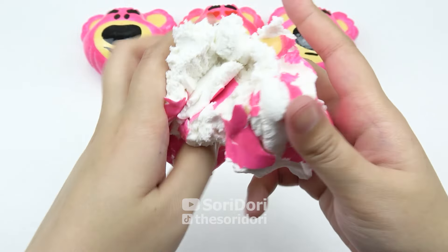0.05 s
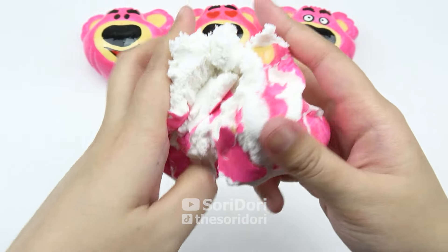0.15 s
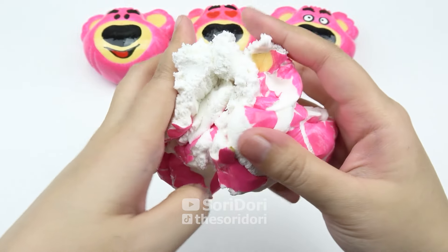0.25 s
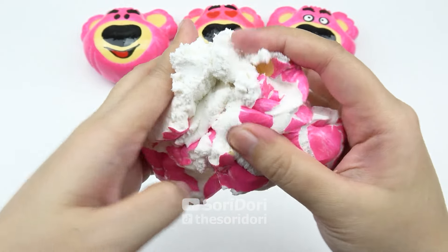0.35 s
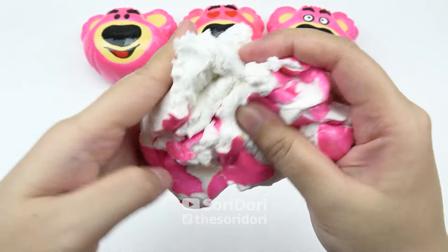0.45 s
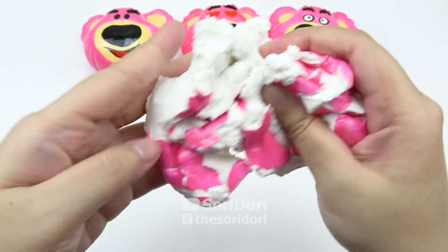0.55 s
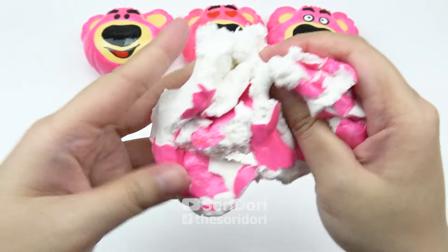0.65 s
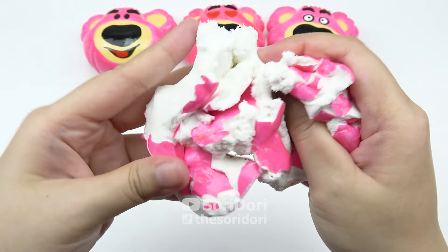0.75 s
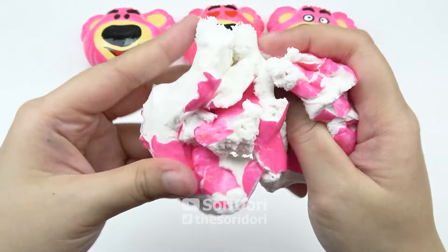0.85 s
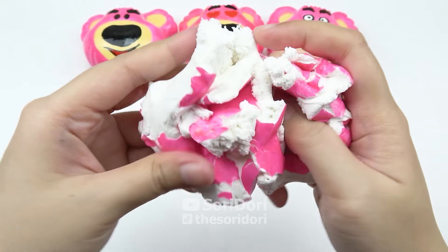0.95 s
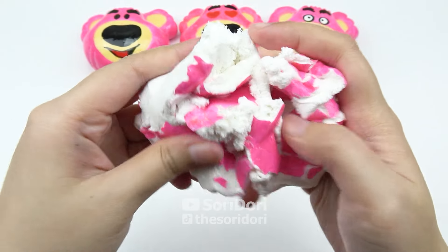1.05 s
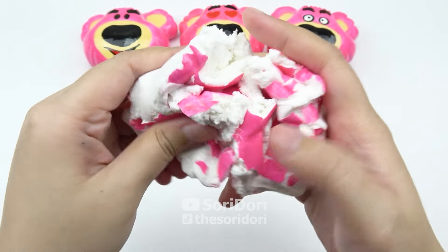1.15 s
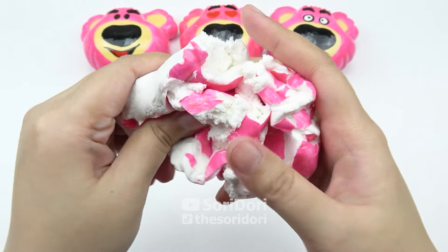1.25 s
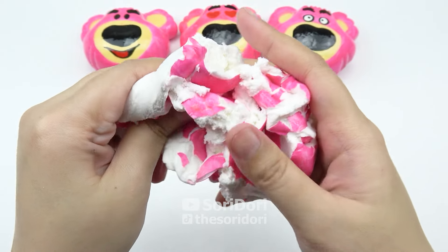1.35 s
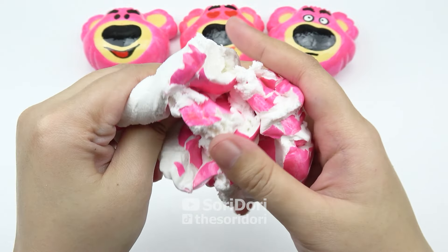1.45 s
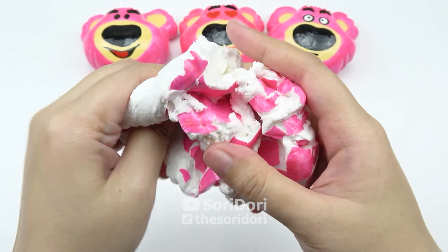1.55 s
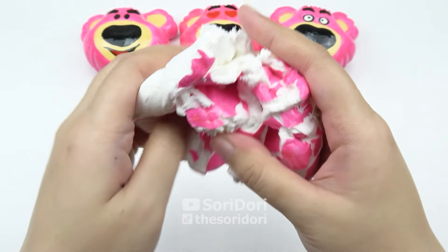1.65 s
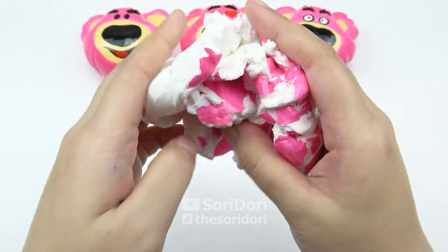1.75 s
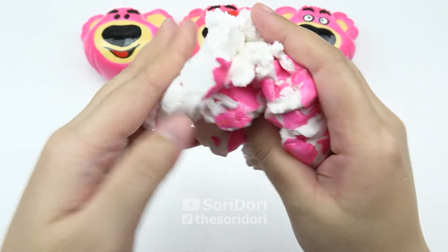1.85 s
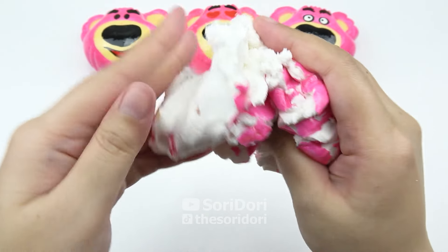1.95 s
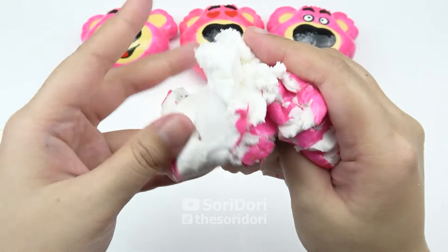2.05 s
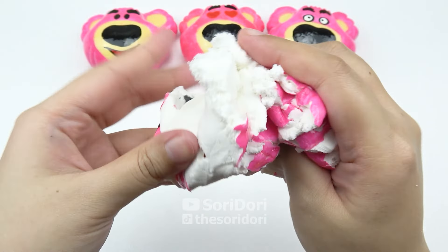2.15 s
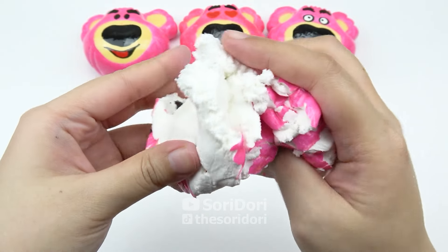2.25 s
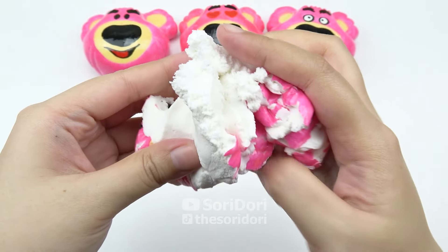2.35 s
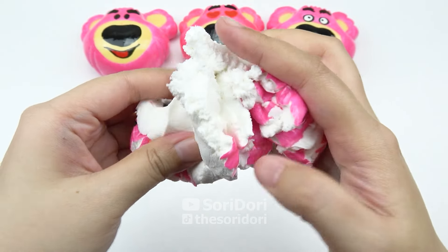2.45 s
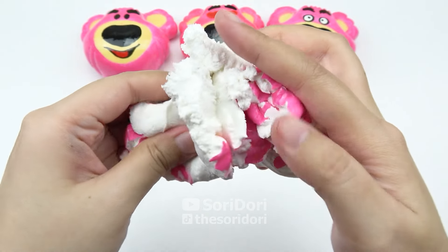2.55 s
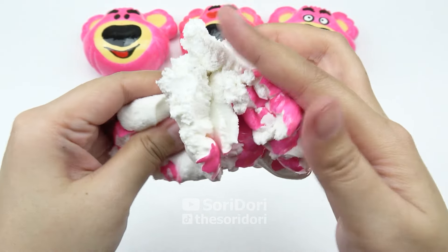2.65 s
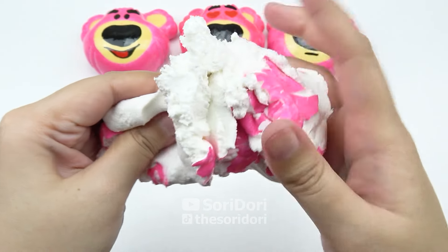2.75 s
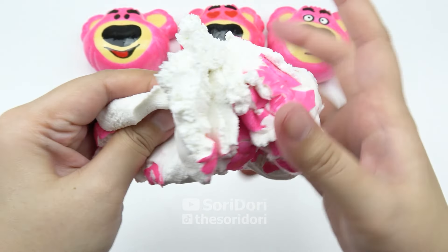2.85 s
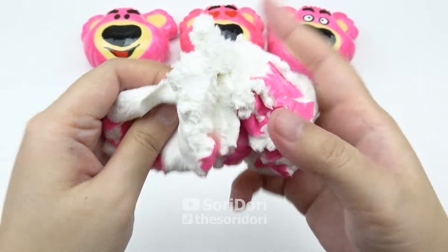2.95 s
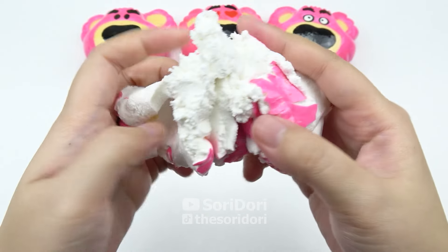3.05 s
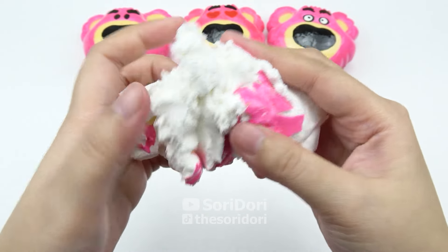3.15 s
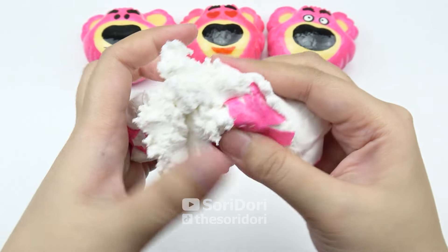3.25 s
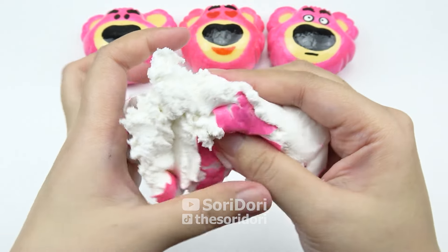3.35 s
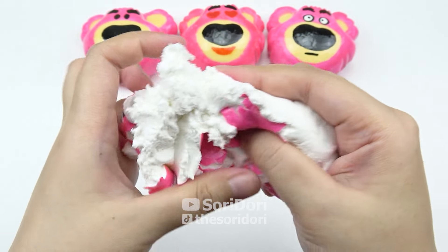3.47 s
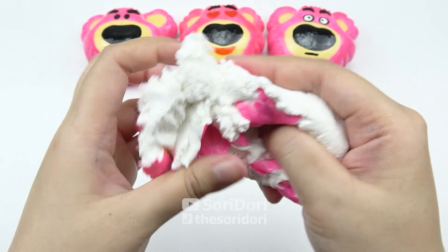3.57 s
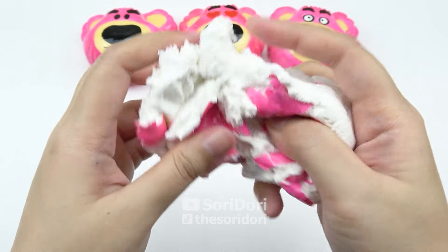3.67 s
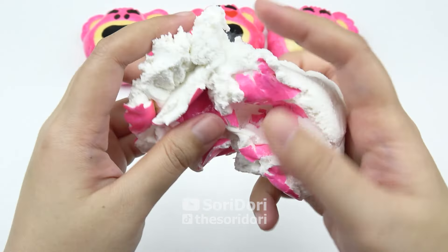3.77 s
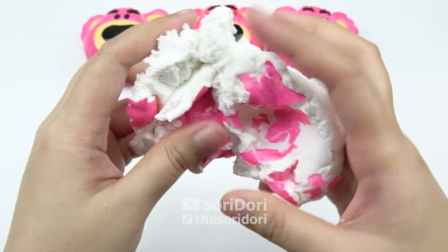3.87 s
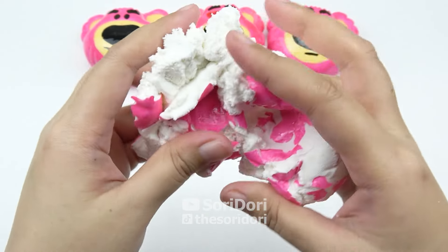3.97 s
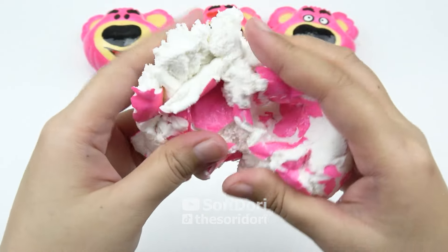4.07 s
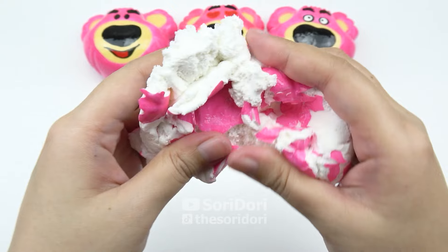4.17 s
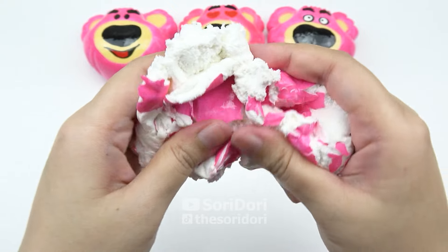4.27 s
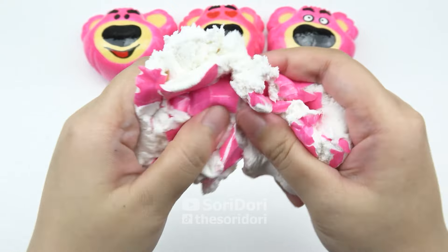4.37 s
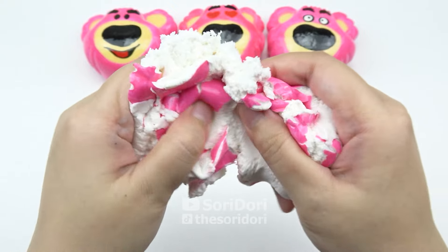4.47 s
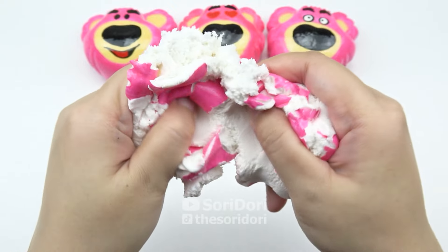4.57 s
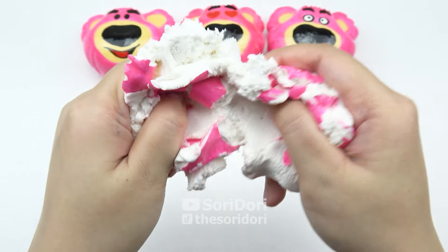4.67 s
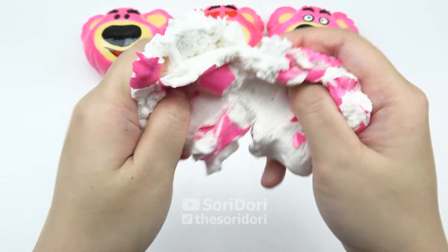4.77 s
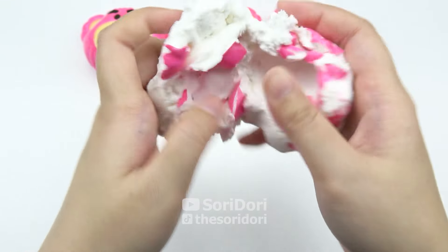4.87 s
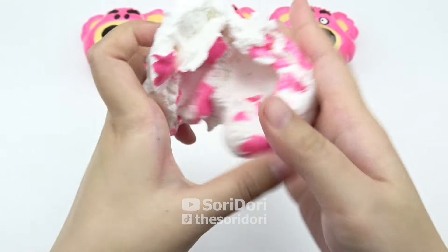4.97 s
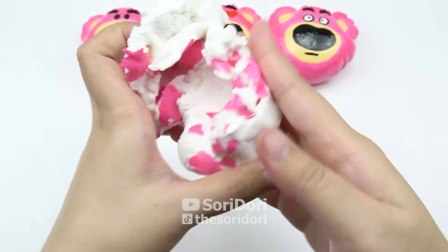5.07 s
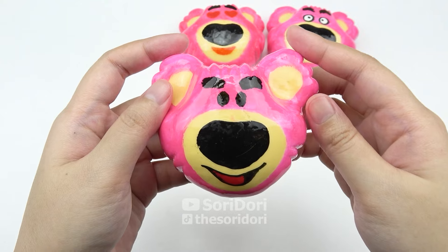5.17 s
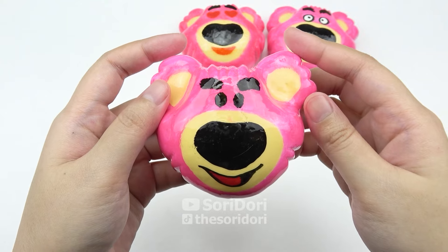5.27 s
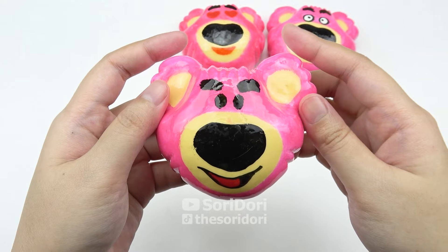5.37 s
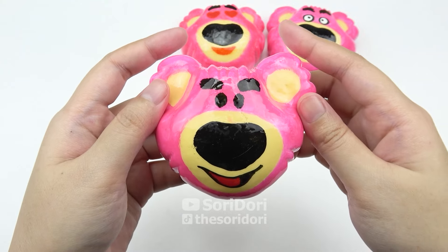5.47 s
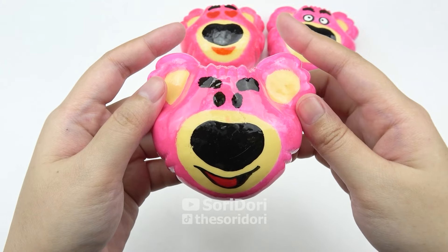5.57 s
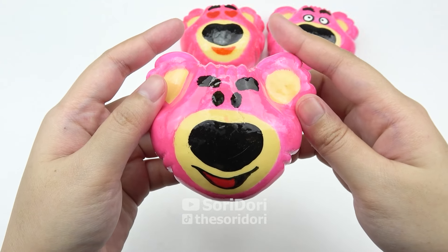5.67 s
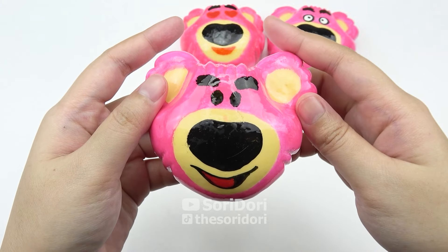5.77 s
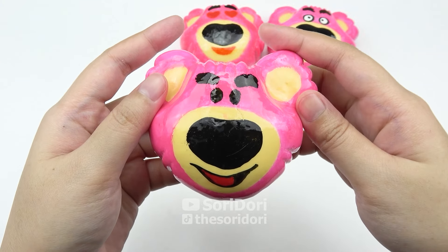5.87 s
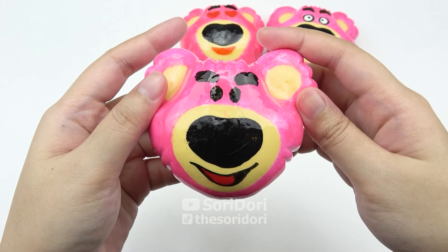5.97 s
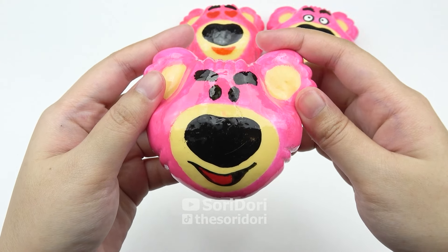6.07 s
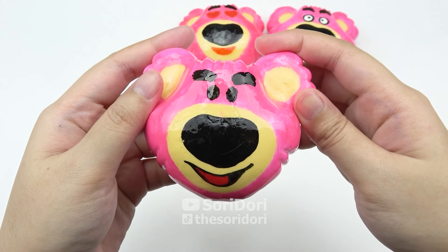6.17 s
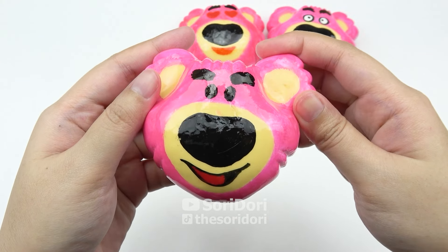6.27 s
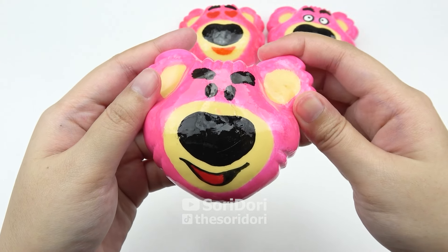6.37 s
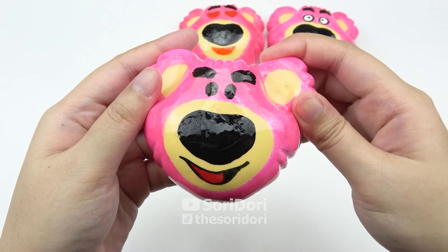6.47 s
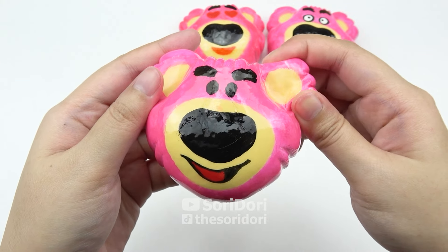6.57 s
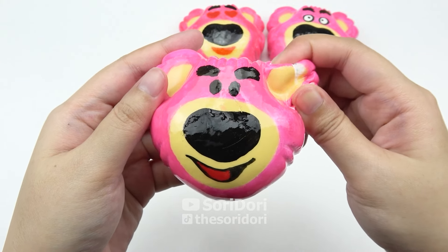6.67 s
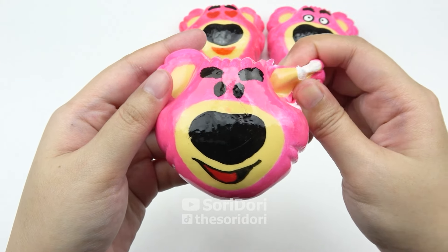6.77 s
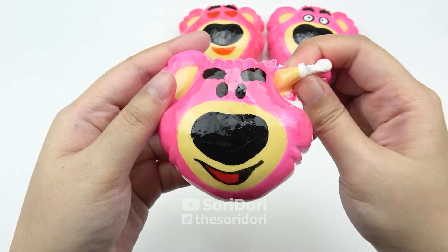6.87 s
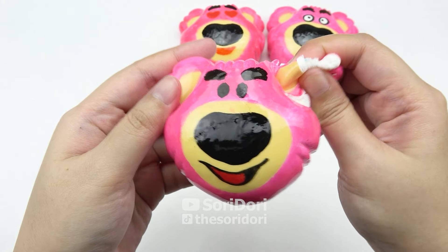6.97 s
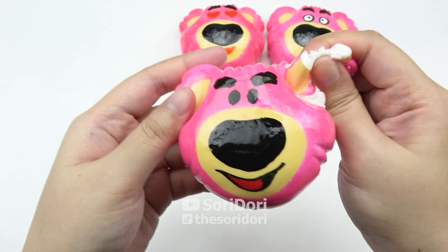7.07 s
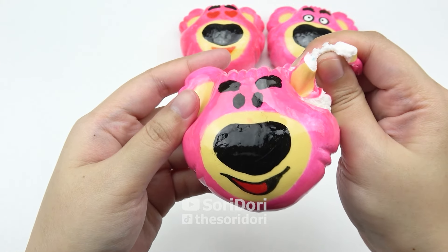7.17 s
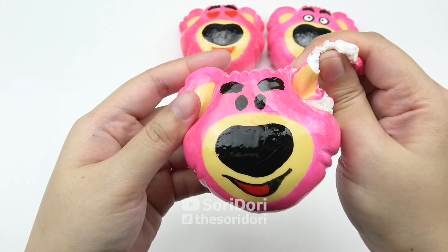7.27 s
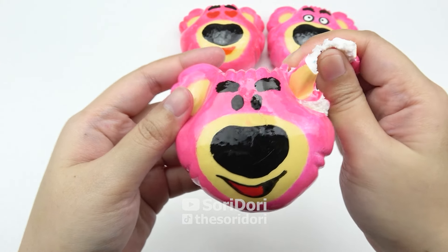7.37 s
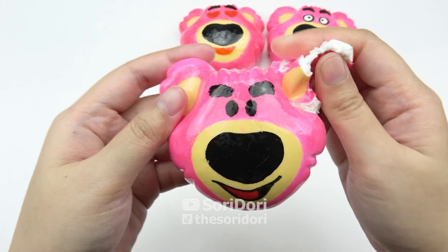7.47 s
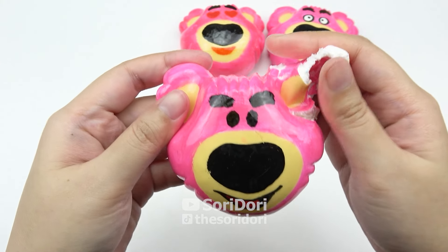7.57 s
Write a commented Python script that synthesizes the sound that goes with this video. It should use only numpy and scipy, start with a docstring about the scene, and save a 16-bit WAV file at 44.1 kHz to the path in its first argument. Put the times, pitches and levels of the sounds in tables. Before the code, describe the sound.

Hands squeeze and tear a brittle painted clay figure, making crisp, close cracks and crunches in repeated bursts with short pauses.

```python
"""A table in a small room, a stereo microphone close to hands that squeeze and tear a clay figure.
Two shots are joined by an edit, with a quiet gap between. Each crack of the brittle painted shell is a
few cycles of a ringing flake, answered by the table top, one hard wall and the room. Finer crackle runs
under the cracks, the hands thud through the table, and the building rumbles faintly in the distance.
A noise gate turns down faint treble, and the loudest cracks overload the microphone channel."""
import sys
import numpy as np
from scipy import signal
from scipy.fft import rfft, irfft, next_fast_len
from scipy.io import wavfile
from scipy.ndimage import uniform_filter1d, map_coordinates

SR = 44100
rng = np.random.default_rng(int(sys.argv[2]) if len(sys.argv) > 2 else 0)


def to_wav(s):
    """Save 16-bit WAV."""
    ch = np.atleast_2d(s).T  # columns
    pcm = np.round(np.clip(ch, -1, 1) * 32767)  # PCM
    wavfile.write(sys.argv[1], SR, pcm.astype(np.int16))


N = 336042

# single cracks of the shell: start_s, level_db, pitch_hz, body_db (relative to level_db)
SHELL_CRACKS = [(.0068,-11,4180,7.5),(0.2507,-40,3350,-15.5),(.288,-39.5,3360,-4.5),(0.391,-7.5,7780,1.5),(0.4096,-6.5,6250,-40),(0.4258,-4.5,3000,-31),(.4346,2,5350,-41),(0.467,-3.5,3700,-41),(0.4798,-6,5530,-45),(0.4897,-7.5,6070,-29),(0.4999,-0.5,4500,5),(.5423,-9.5,5434,-39),(0.5821,-5,5690,-39),(0.6423,-9,8800,-39),(.6919,-4.5,7660,4),(0.7014,1,8250,-31),
                (0.9453,-9.5,3624,-34),(1.0015,-8.5,5960,-14.5),(1.0907,-1.5,3100,-21),(1.097,-11,9770,2.5),(1.0992,7.5,11800,-32.5),(1.1484,-14.5,9340,-13),(1.1836,-3.5,3600,-41),(1.241,-1.5,8760,9),(1.34,-16.5,6760,-40),(1.3845,-8,3600,12.5),(1.388,1,1370,2),(1.4589,-7.5,4560,-3.5),
                (1.7555,-8,5080,-17),(1.823,-7.5,5173,-27),(1.894,-17,3210,5.5),(1.9195,-3.5,5830,-12),(1.9546,-8.5,5020,-28),(1.9697,5,5320,-21.5),(1.9837,-16.5,5600,-34),(2.0024,-8,4330,-25.5),(2.0802,-8.5,3580,-40),(2.14,-13,4120,-40),(2.176,-18.5,9560,-9),(2.2733,-25,2200,18.5),
                (2.4614,-6,3944,-41.5),(2.483,6,2485,-44),(2.6012,-10.5,4060,-30),(2.6244,1,2550,-41),(2.71,-9.5,5780,-41),(2.751,4,8400,-12),(2.7793,.5,3230,-41),(2.794,-10.5,4620,-40),
                (3.129,-5,1853,-15),(3.217,-12.5,9290,-41),(3.246,-9,5420,-37.5),(3.2993,-6,3830,-40),(3.353,-7,6370,-41),(3.369,-3,2580,-8.5),(3.3768,4,3110,-24),(3.3791,3,2140,-31.5),(3.4959,-7,8480,-40),(3.5094,-0.5,4600,-15),(3.5513,-4,4200,-42),(3.6437,-16,4390,-38),
                (4.1727,-12,4100,-14),(4.2268,-8.5,5600,-40),(4.2665,-11.5,4850,-40),(4.3497,-1.5,10120,-10.5),(4.3737,-6.5,7800,-40),(4.4102,-10,4820,-37),(4.4324,-5.5,5490,-36),(4.4351,-5,8440,-40),(4.4728,-7,6800,-42),(4.5046,-9.5,4200,-42),(4.5313,0,6200,-40),(4.5424,-1.5,7910,-38),(4.5482,-1,4426,-37),(4.56,-5.5,6770,-25.5),(4.5941,-2.5,9000,-39.5),(4.6123,-6.5,8600,-39),(4.6363,-9.5,5680,-42.5),(4.6736,-3.5,8910,-40),(4.6817,0.5,8960,-36.5),(4.732,-4.5,7915,-40.5),(4.762,-10,8590,-39),(4.8702,-8,2640,17),(4.8827,7.5,5550,-37),(4.8853,-4,8480,-1),(4.8958,-9.5,3610,7.5),(5.0537,-1.5,9200,-40),
                (6.4031,-6.5,4050,1.5),(6.4827,-4,8940,-40),(6.5487,-2.5,7240,0.5),(6.5577,-6,9900,-27),(6.5818,5,4100,-27),(6.5846,1,6550,-5),(6.6212,5.5,3530,4.5),(6.6508,-7,4360,14),(6.66,7.5,7600,5),(6.664,-7.5,7920,-31),(6.6997,-2,5040,8),(6.7252,-17,6890,-18),(6.7563,3.5,9270,1),(6.7801,8.5,4820,-36),(6.8417,-6.5,9100,-38),(6.9188,-5.5,9200,-20),(6.9373,-8.5,7900,-38),(6.9602,3.5,5900,-11),(6.98,-5.5,4400,3.5),(6.996,-9,5860,-10),(7.0074,-3.5,6500,5),(7.0198,20,8880,-7.5),(7.0912,0,6340,-8),(7.1494,-6.5,8200,-12),(7.1932,-5,6400,-40),(7.2176,-1,6760,-17),(7.3073,1.5,5080,-40),(7.3673,7,5660,-22),(7.5089,-11.5,3940,-25)]
# patches that crumble in a quick run of fractures: start_s, level_db, pitch_hz
CRUMBLING_PATCHES = [(0.0725,-10,2470),(.3581,-15.5,5100),(0.85,-21.5,2250),(0.8827,-22.5,3120),(0.8992,-14,2030),(1.6069,-9.5,2170),(1.735,-15,2310),(2.2742,-16.5,2000),(2.9492,-27.5,3130),(2.9839,-18.5,5700),(3.0397,-22.5,2320),(3.067,-30,2280),(3.2,-12,2970),(3.708,-11.5,3180),(3.742,-1.5,2750),(4.0726,-27.5,1780),(4.105,-29.5,2700),(4.1225,-22,2760),(4.83,-25,1650),(4.8582,-12,3220),(4.8713,-4.5,5830),(6.5119,-14.5,5320),(7.0184,7,5240),(7.2447,-8,6700)]
# squeezes, each a surge of crackle: full_at_s, held_s, crunch_db, fizz_db (relative to crunch_db)
HAND_SQUEEZES = [(0,0.0056,-27,-14.5),(0.391,0.14,-25.5,-4),(0.699,0.0092,-30,-2.5),(0.941,0.043,-25.5,-11),(1.11,0.15,-31,0),(1.3,0.15,-31.5,-11),(1.64,0.096,-27.5,-15.5),(1.8,0.097,-22,-18.5),(1.97,.03,-19,-8.5),(2.15,0.21,-39.5,-13.5),(2.551,0.096,-26.5,-12.5),(2.77,.03,-26.5,-3),(3.03,0.017,-33.5,-17.5),(3.23,0.12,-36.5,-6),(3.39,0.18,-25.5,-13),(3.748,0.0081,-23.5,-18.5),(4.22,0.05,-33,-3.5),(4.368,0.03,-22,-5),(4.6,0.09,-24,-7.5),(4.889,0.012,-24,-2),(5.07,0.016,-35.5,-11.5),(6.43,0.1,-55,2.5),(6.64,0.13,-16.5,-4.5),(6.85,0.17,-25,-2),(7.04,.03,-7,-11),(7.299,0.14,-42,7.5)]
# two high-pass stages that thin the bass of the cracks: corner_hz, width_hz
FIGURE_HIGH_PASS = [(300, 1510), (800, 2720)]
# two shots joined by an edit, each with its own wall echo: start_s, end_s, wall_delay_s
SHOTS = [(0, 5.135, .00532), (6.38, 7.7, .00439)]
# pushes of the hands through the table: start_s, level_db
HAND_PUSHES = [(.003,-19),(.697,-33),(1.094,-40),(1.24,-40.5),(1.391,-31),(1.966,-30),(2.273,-35),(2.483,-39.5),(2.622,-36),(2.758,-30.5),(3.125,-40),(3.376,-33),(3.75,-31.5),(4.874,-18.5),(6.618,-22),(6.654,-30),(7.015,-18),(7.09,-28),(7.364,-35)]
# spectrum of a push: frequency_hz, relative_db
THUD_SPECTRUM = [(15, -25.5), (40, -5.5), (90, -5.5), (200, -8.5), (350, -9), (700, -24.5), (1500, -88.5)]
# near reflections off the table top: delay_s, gain_db
TABLE_REFLECTIONS = [(.0009, -11), (.0016, -18), (.0027, -20)]
# decay of the room: frequency_hz, t60_s
ROOM_DECAY = [(300, .22), (1000, 0.2), (2500, 0.31), (6000, 0.46), (12000, 0.44)]
# colour of the room's tail: frequency_hz, relative_db
ROOM_SPECTRUM = [(300, 7.5), (1000, 9.5), (2500, 11), (6000, -0.1), (12000, 1), (16000, -11)]
# left-right likeness of the tail: frequency_hz, correlation
ROOM_LIKENESS = [(300, .5), (1000, .7), (2500, .9), (6000, .5), (12000, .25)]
# distant rumble of the building: frequency_hz, relative_db
RUMBLE_SPECTRUM = [(8.8, -47), (15, -15.5), (86, -2.5), (106, -5.5), (155, -11.5), (200, -15), (239, -16.5),
                   (388, -32), (1100, -45), (1430, -100), (2420, -120)]
# treble lift of the microphone: frequency_hz, gain_db
MIC_COLOUR = [(3000, 0.21), (6000, 5.5), (10000, 8), (13000, 6.5), (16000, 1)]


def cracks():
    """Close up, a flake rings briefly, the lump under it knocks and the breaking edge ticks."""
    start_s, db, hz, body_db = np.transpose(SHELL_CRACKS)
    scatter = rng.standard_normal((len(start_s), 6)).T
    high_hz, low_hz = 1.6 * hz * np.exp(.15 * scatter[0]), .45 * hz * np.exp(.15 * scatter[1])
    body_hz, edge_hz = 800 * np.exp(.2 * scatter[2]), 12000 * np.exp(.12 * scatter[3])
    edge_db = -8 + 3.07 * np.log2(hz / 5000)  # thin, high flakes break with the sharpest edge
    flake = rings(start_s, db + .5, hz, cycles=2.4, samples=512)
    overtone = rings(start_s + .0001, db - 2 + 2 * scatter[4], high_hz, cycles=2, samples=256)
    undertone = rings(start_s + .00018, db - .5 + 2 * scatter[5], low_hz, cycles=1.7, samples=512)
    body = rings(start_s, db + body_db - .5, body_hz, cycles=1.2, samples=1024)
    edge = rings(start_s, db + edge_db, edge_hz, cycles=1.6, samples=64)
    return flake + overtone + undertone + body + edge


def crumbles(count=48, mean_delay_s=.007):
    """Each patch gives way in many small fractures that thin out after the first."""
    start_s, db, hz = np.transpose(CRUMBLING_PATCHES)[:, :, None]
    shape = (len(start_s), count)
    pitch_hz = hz * np.exp(.6 * rng.standard_normal(shape))
    break_s = start_s + mean_delay_s * rng.exponential(1, shape)
    level_db = db - 11.5 + 2 * rng.standard_normal(shape)
    return rings(break_s.ravel(), level_db.ravel(), pitch_hz.ravel(), cycles=2.1, samples=384)


def crackle():
    """Under each squeeze, larger crumbs crunch and paint splinters fizz."""
    crunch_gain, fizz_gain = squeezes()
    crunch = grit(centre_hz=2750, spread=.45, spiky_db=6, count=3500)
    fizz = grit(centre_hz=8400, spread=.3, spiky_db=5.5, count=5000)
    return amp(-8) * (crunch_gain * crunch + fizz_gain * fizz)


def squeezes(build_db_per_s=349.5, ease_db_per_s=179):
    """Crunch and fizz gains over time as the hands tighten, hold and let go."""
    full_s, held_s, db, fizz_db = np.transpose(HAND_SQUEEZES)[:, :, None]
    t = np.arange(0, N, 32) / SR
    before_s, after_s = (full_s - t).clip(0), (t - full_s - held_s).clip(0)
    crunch_db = db - build_db_per_s * before_s - ease_db_per_s * after_s
    return [np.interp(np.arange(N) / SR, t, amp(level_db).sum(0))
            for level_db in (crunch_db, crunch_db + fizz_db)]


def grit(centre_hz, spread, spiky_db, count):
    """Tiny random fractures, mostly faint, a few strong."""
    start_s = rng.uniform(0, N / SR, count)
    level_db = spiky_db * np.minimum(rng.exponential(1, count), 3.5)
    pitch_hz = centre_hz * np.exp(spread * rng.standard_normal(count))
    return unit_rms(rings(start_s, level_db, pitch_hz, cycles=2.2, samples=192))


def rings(start_s, db, hz, cycles, samples):
    """Damped sines that rise within a fraction of a cycle and lose 20 dB over `cycles`."""
    k = np.arange(samples)
    turns = np.clip(hz, 20, .36 * SR)[:, None] * k / SR
    envelope = amp(-20 * turns / cycles) * (1 - np.exp(-turns / .15))
    waves = amp(db)[:, None] * np.sin(2 * np.pi * turns) * envelope
    where = np.round(start_s * SR).astype(int)[:, None] + k
    return np.bincount(where.ravel(), waves.ravel(), N + SR)[:N]


def bass_thinned(x):
    """The cracks carry little bass: two high-pass stages thin their low end."""
    def response(f):
        stages = [-f * f / (hz * hz - f * f + 1j * f * width) for hz, width in FIGURE_HIGH_PASS]
        return np.prod(stages, axis=0)
    return filtered(x, response)


def thuds(rise_s=.0033, t60_s=.094):
    """Dull pushes of the hands travel through the table and reach left and right differently."""
    t, swell = np.arange(SR // 2) / SR, np.zeros(N + SR)
    for start_s, db in HAND_PUSHES:
        swell[round(start_s * SR):][:len(t)] += amp(db - 60 * t / t60_s) * (1 - np.exp(-t / rise_s))
    return swell[:N] * stereo_noise(THUD_SPECTRUM, likeness=.26)


def fingertip():
    """One faint fingertip contact rings just before the second shot."""
    return rings(start_s=np.array([6.248]), db=[-62], hz=[1190], cycles=45, samples=4096)


def echoes(x, wall_delay_s, wall_db=-1.5):
    """The table top repeats each sound at once and weakly, the wall a little later and strongly."""
    def response(f):
        table = sum(amp(db) * np.exp(-2j * np.pi * f * delay_s) for delay_s, db in TABLE_REFLECTIONS)
        wall = amp(wall_db) * np.exp(-2j * np.pi * f * wall_delay_s)
        return (1 + table) * (1 + wall)
    return filtered(x, response)


def room(x, level_db=-4, clutter_db=7, clutter_t60_s=.045):
    """The small room's diffuse tail, different for each moment because the hands keep moving."""
    out, step = np.zeros((2, N + SR)), SR // 12
    for start in range(0, N, step):
        hz, t, noise = signal.stft(rng.standard_normal((2, SR // 3)), SR, nperseg=128)
        hz = hz[:, None]
        clutter = amp(clutter_db - 60 * t / clutter_t60_s)  # strong, brief scatter around the table
        decay = amp(-60 * t / curve(ROOM_DECAY, hz)) + clutter
        bands = stereo_pair(noise, curve(ROOM_LIKENESS, hz)) * amp(curve(ROOM_SPECTRUM, hz))
        tail = signal.istft(bands * decay, SR, nperseg=128)[1]
        wet = signal.fftconvolve(x[None, start:start + step], tail / np.linalg.norm(tail[0]), axes=1)
        out[:, start:start + wet.shape[1]] += wet
    return amp(level_db) * out[:, :N]


def building_rumble():
    """Steady low noise from far off in the building."""
    return amp(-60.5) * stereo_noise(RUMBLE_SPECTRUM, likeness=.54)


def amplifier_hiss():
    """A trace of amplifier noise that falls away above 300 Hz."""
    return amp(-62) * filtered(rng.standard_normal((2, N)), lambda f: amp(-8 * np.log2(1 + f / 300)))


def mic_ports(x, lag_s=5e-6, wander_hz=90):
    """Fractures lie left or right of centre, so one microphone port hears each microseconds sooner."""
    positions = rng.standard_normal(int(N * wander_hz / SR) + 4)
    position = map_coordinates(positions, [np.arange(N) * wander_hz / SR])
    slope = filtered(x, lambda f: 2j * np.pi * f)
    side = lag_s * position * slope  # adding a little slope shifts the wave in time
    return np.array([x + side, x - side])


def noise_gate(x, threshold_db=-83, cut_db_per_db=1.3, max_cut_db=16, corner_hz=700):
    """Treble bands that fall under the threshold are turned down further, so tails break off early."""
    hz, _, bands = signal.stft(x, SR, nperseg=512)
    power = np.mean(abs(bands) ** 2, axis=0)
    power = uniform_filter1d(uniform_filter1d(power, size=7, axis=0), size=3, axis=1)
    band_db = 10 * np.log10(abs(power) + 1e-20)
    cut_db = np.clip(cut_db_per_db * (band_db - threshold_db), -max_cut_db, 0)
    treble_share = hz ** 2 / (hz ** 2 + corner_hz ** 2)
    return signal.istft(bands * amp(cut_db * treble_share[:, None]), SR, nperseg=512)[1][:, :N]


def stereo_noise(spectrum, likeness):
    """Left and right noise of the given spectrum, at rms 1."""
    white = stereo_pair(rng.standard_normal((2, N)), likeness)
    return unit_rms(filtered(white, lambda f: amp(curve(spectrum, f))))


def stereo_pair(noises, likeness):
    """Two unrelated signals mixed into a left and right of the given correlation."""
    turn = np.arccos(np.clip(likeness, -1, 1)) / 2
    mid, side = noises[0] * np.cos(turn), noises[1] * np.sin(turn)
    return np.array([mid + side, mid - side])


def filtered(x, response):
    """x passed through a frequency response."""
    size = next_fast_len(N + 8192)
    return irfft(rfft(x, size) * response(np.fft.rfftfreq(size, 1 / SR)), size)[..., :N]


def curve(points, hz):
    """Value at hz between (frequency_hz, value) points on a log axis."""
    point_hz, values = np.transpose(points)
    return np.interp(np.log(hz + 1), np.log(point_hz + 1), values)


def amp(db):
    """Gain of a level in dB."""
    return 10 ** (np.asarray(db) / 20)


def unit_rms(x):
    """Scaled to rms 1."""
    return x / np.sqrt(np.mean(x ** 2) + 1e-20)


def scene():
    """An edit cuts the crackle off at 5.135 s; it starts again in a second shot with its own wall echo."""
    clay = bass_thinned(cracks() + crumbles() + crackle())
    out = building_rumble() + amplifier_hiss() + thuds() + fingertip()
    t = np.arange(N) / SR
    for start_s, end_s, wall_delay_s in SHOTS:
        shot = clay * ((t >= start_s) & (t < end_s))
        cut = np.clip((end_s - t) / .01, 0, 1)
        out += cut * (mic_ports(echoes(shot, wall_delay_s)) + room(shot))
    return out


def record(dry):
    """Microphone colour, noise gate, hard overload at full scale, then a roll-off from 16 to 16.5 kHz."""
    coloured = filtered(dry, lambda f: amp(curve(MIC_COLOUR, f)))
    overloaded = np.clip(noise_gate(coloured), -1, 1)
    return filtered(overloaded, lambda f: np.sin(np.pi / 2 * np.clip((16500 - f) / 500, 0, 1)) ** 2)


dry = scene()
out = record(dry)
to_wav(out)
```